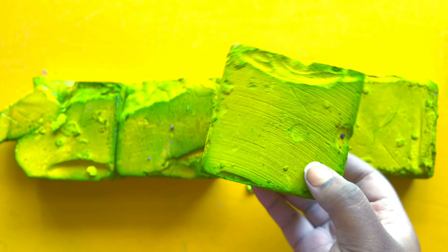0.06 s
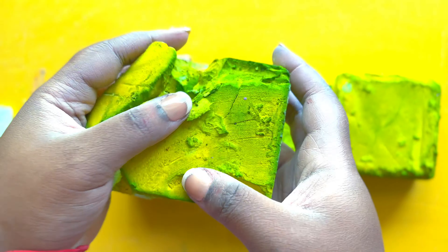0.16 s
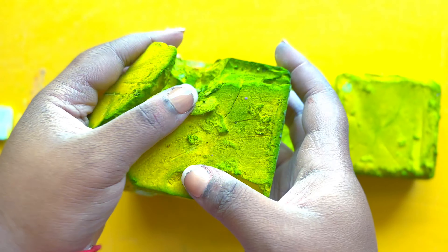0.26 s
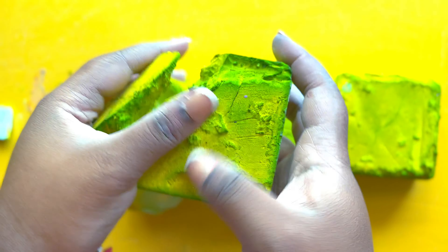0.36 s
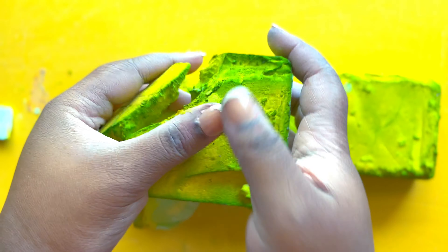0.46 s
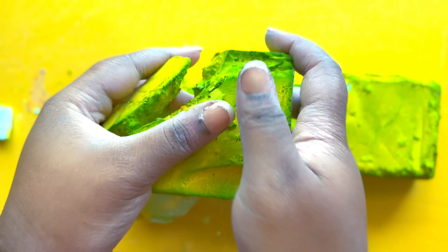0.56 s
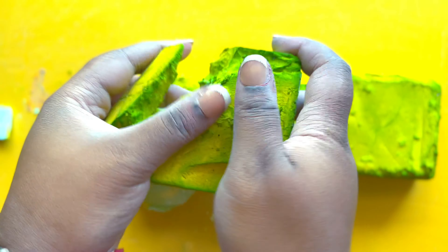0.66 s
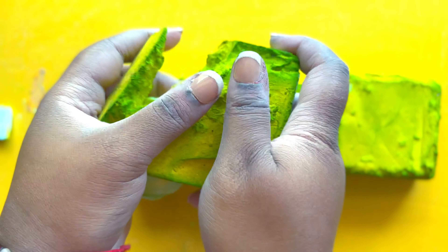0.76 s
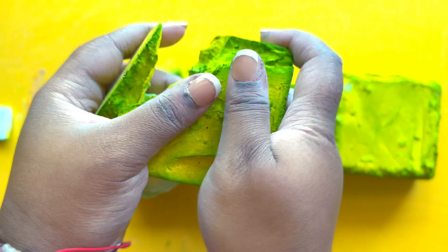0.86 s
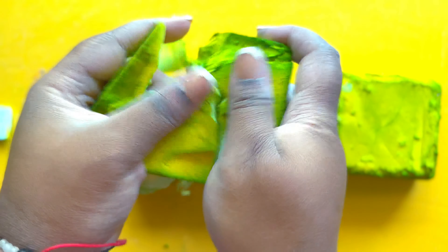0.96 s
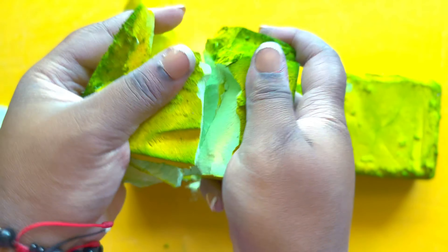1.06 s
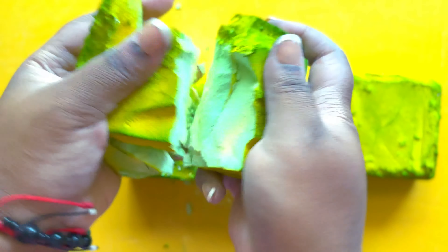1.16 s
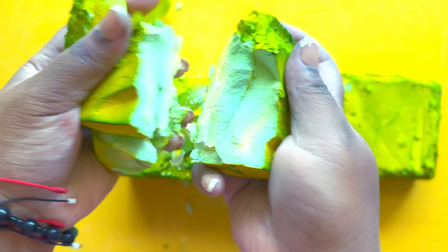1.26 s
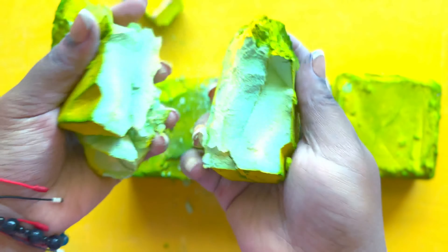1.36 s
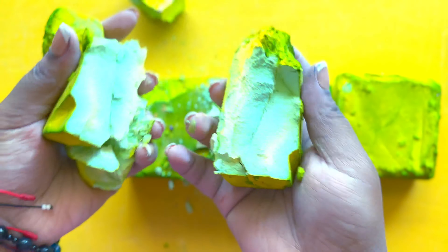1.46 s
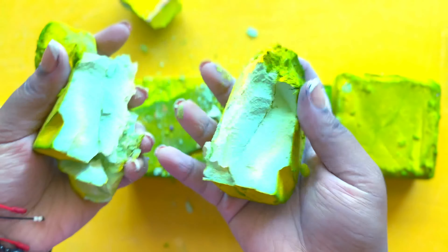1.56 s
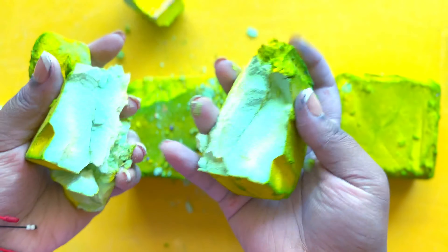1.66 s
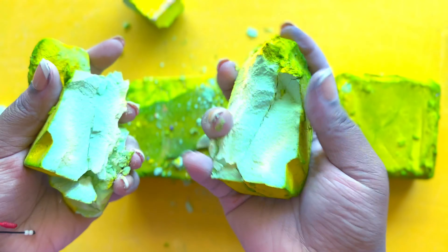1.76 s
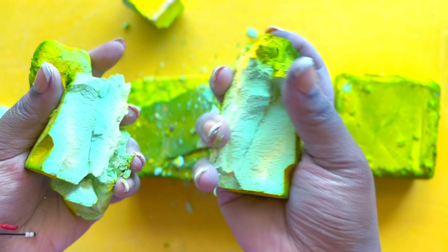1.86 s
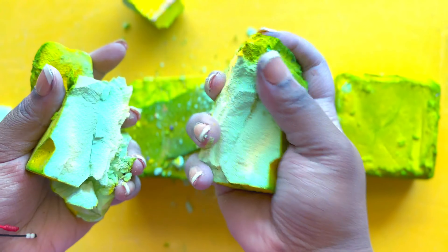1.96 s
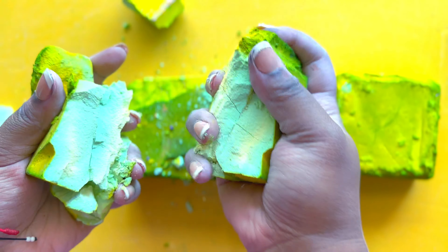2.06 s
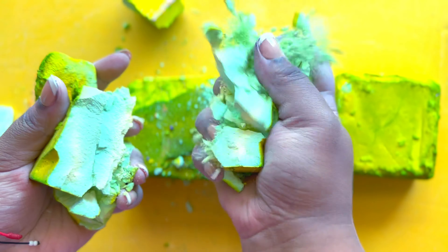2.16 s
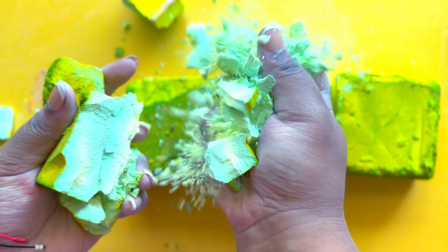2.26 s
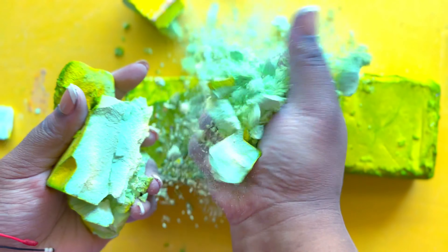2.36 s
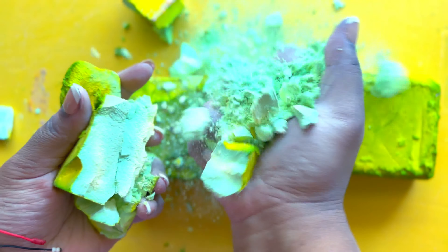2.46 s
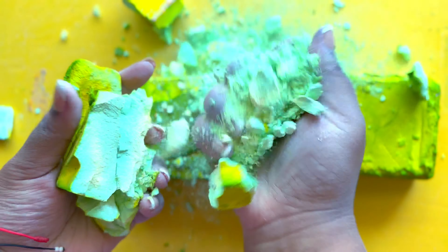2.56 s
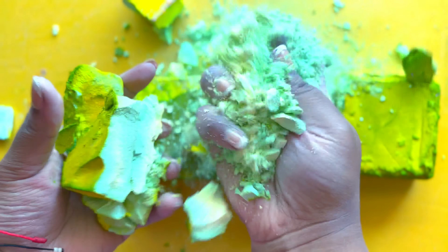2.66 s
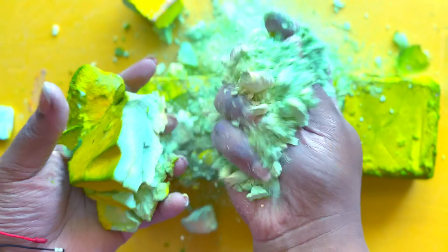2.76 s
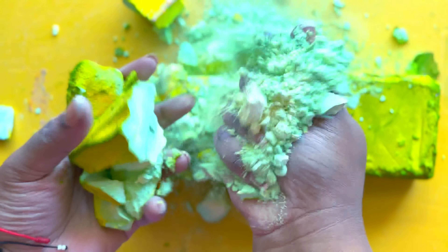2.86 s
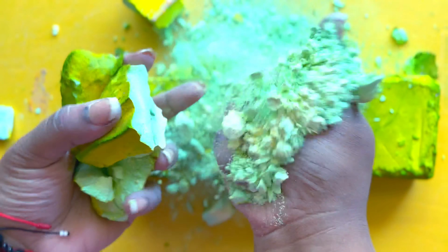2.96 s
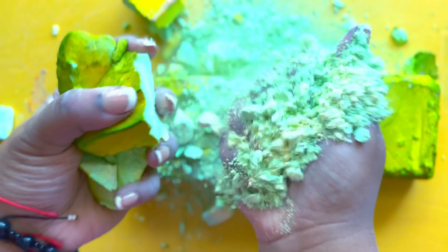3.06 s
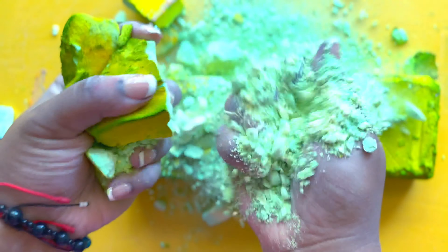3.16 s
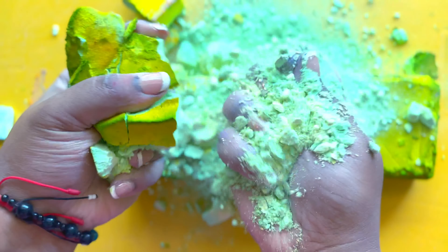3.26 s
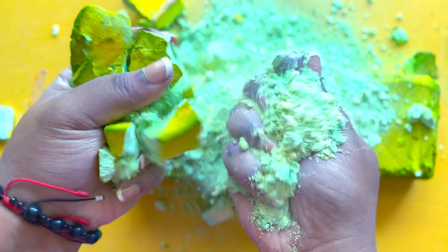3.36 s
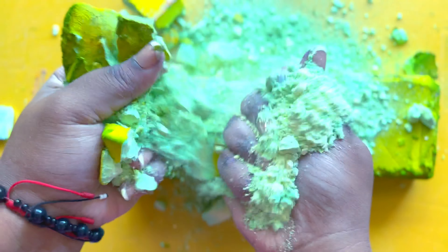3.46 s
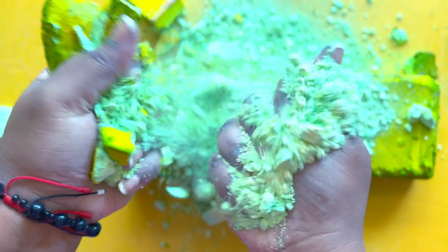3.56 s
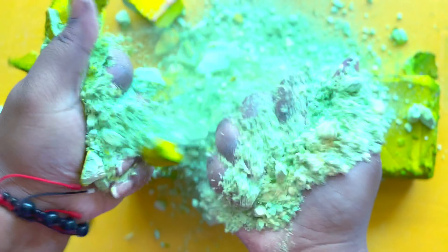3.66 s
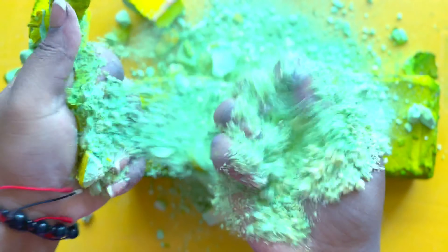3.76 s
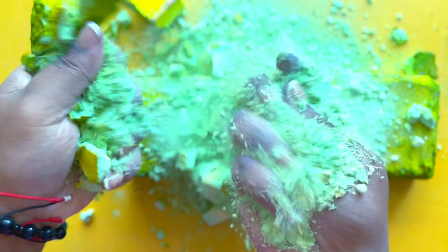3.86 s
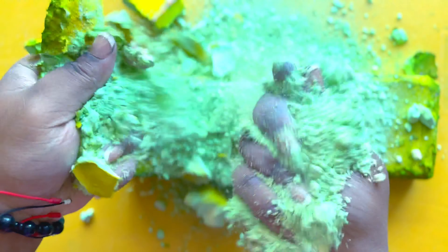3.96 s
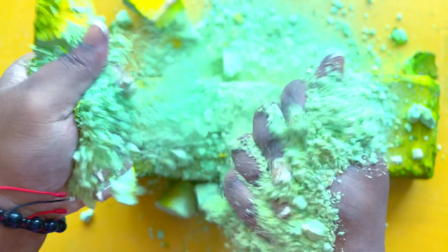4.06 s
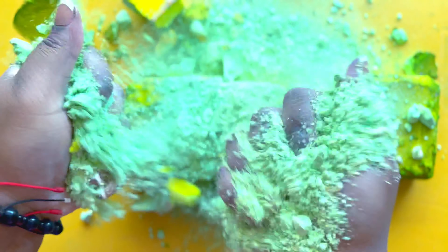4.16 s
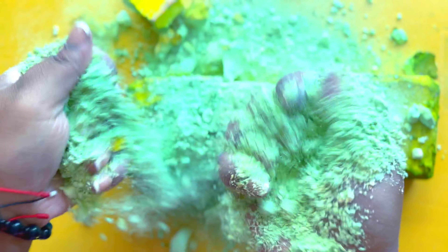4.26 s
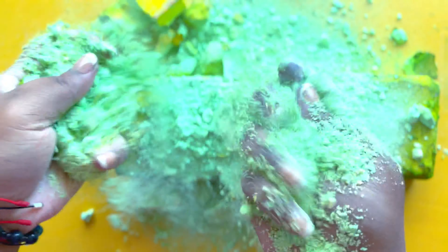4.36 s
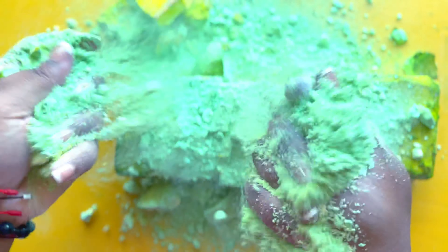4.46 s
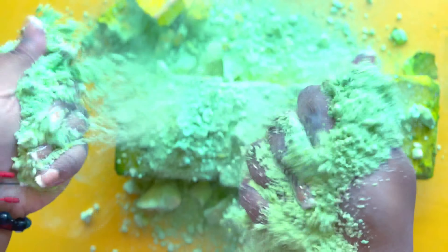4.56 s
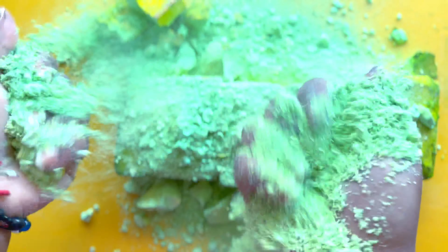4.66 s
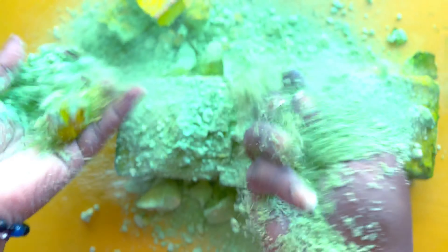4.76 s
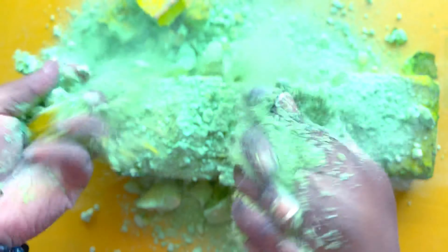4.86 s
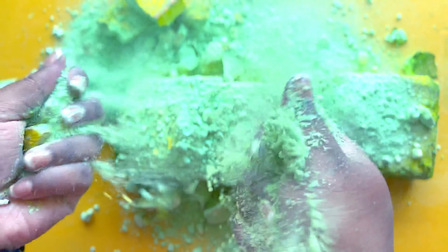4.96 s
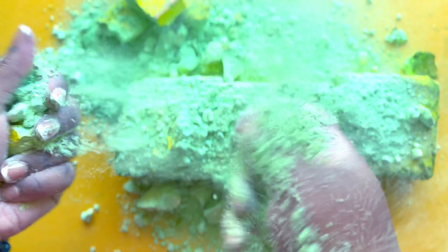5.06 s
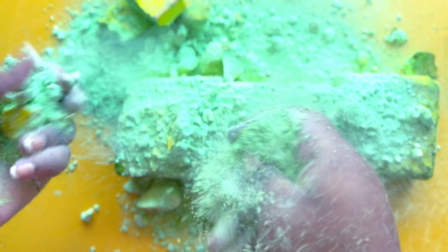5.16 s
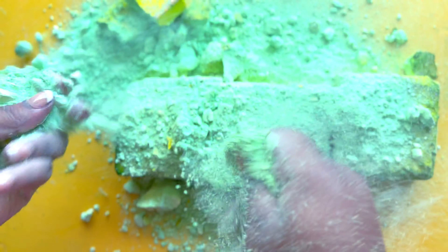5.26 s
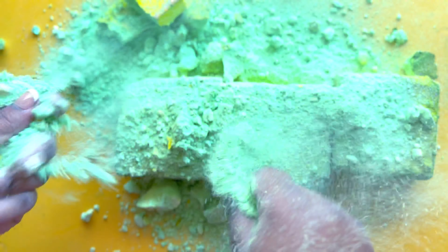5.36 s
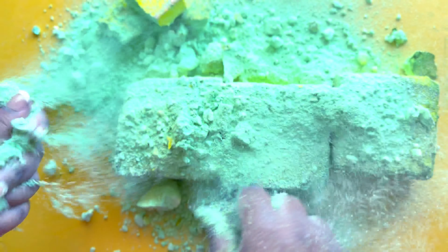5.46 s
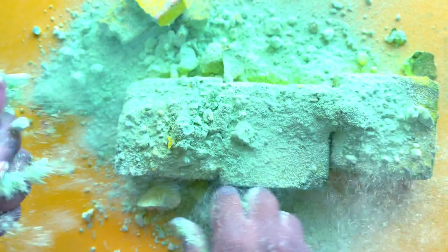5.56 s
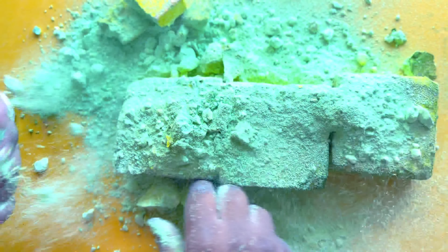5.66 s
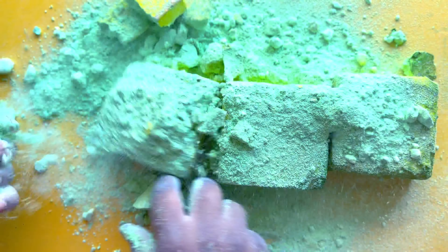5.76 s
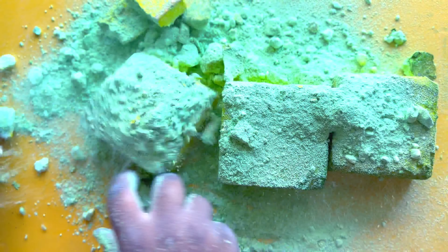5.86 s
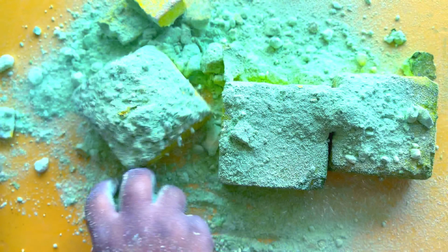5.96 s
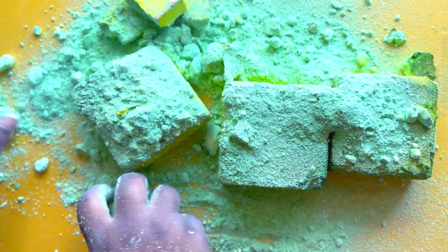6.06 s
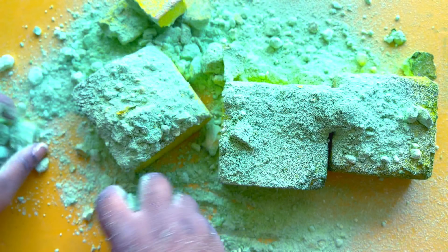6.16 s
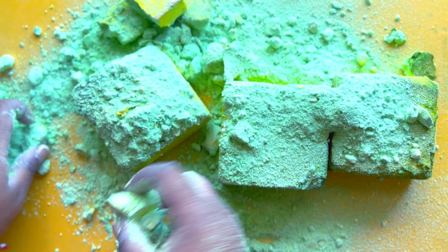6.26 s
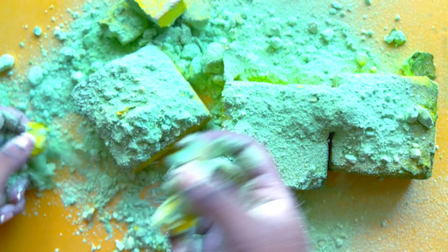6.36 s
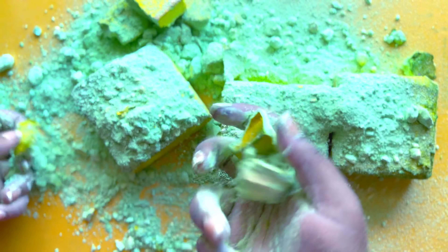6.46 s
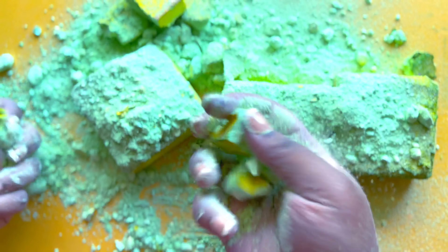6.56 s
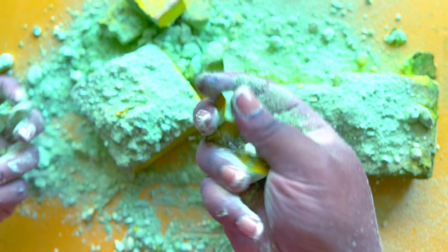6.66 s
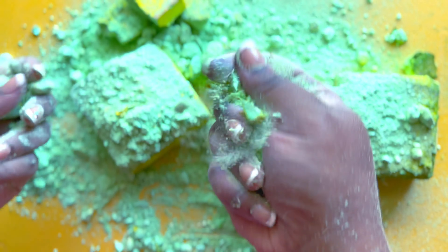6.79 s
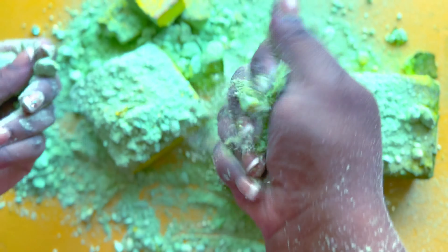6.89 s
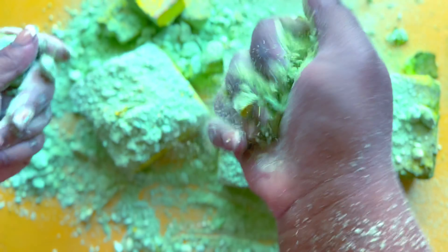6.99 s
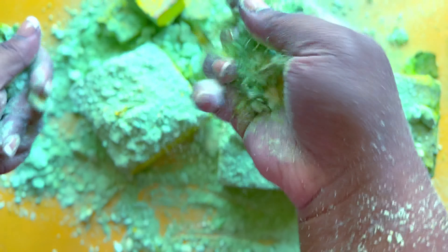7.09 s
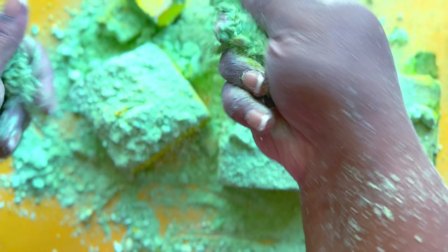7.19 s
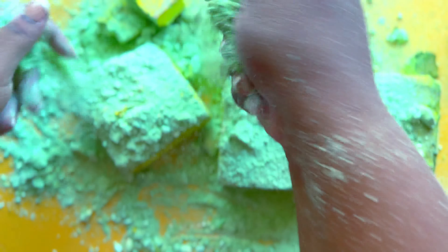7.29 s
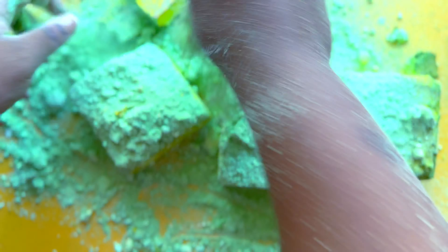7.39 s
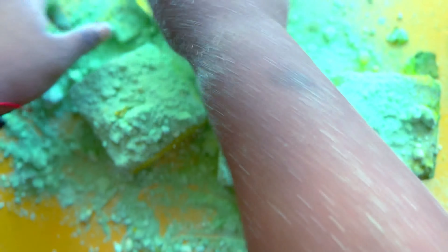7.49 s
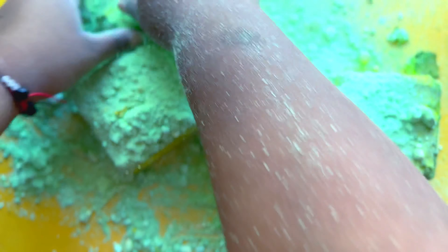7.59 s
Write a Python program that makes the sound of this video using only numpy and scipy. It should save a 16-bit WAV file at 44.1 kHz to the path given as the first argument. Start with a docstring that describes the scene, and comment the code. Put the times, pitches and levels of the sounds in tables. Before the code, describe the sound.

Close to a stereo microphone in a quiet room with a humming fan, hands break a dry chalk block. Soft rubbing and faint crackles lead to one sharp split, then the halves are crushed with dense crunches and snaps. Pieces knock and clink on the table and blocks, the loudest thud coming just past the middle. Powder is then swept in gritty scrapes, and a few last cracks follow.

```python
"""A fan hums in the room; close to a small stereo microphone, two hands break dry chalk over a table.
The blocks snap and crackle: short noise bursts, each filtered by the rings of its piece.
Loose pieces clink and knock as decaying bursts and sagging tones; the heaviest sound the table's modes.
Powder rubs, sifts and scrapes as coloured noise and grains whose levels swell with the hands."""
import sys
import numpy as np
from scipy import signal
from scipy.fft import rfft, irfft, next_fast_len
from scipy.io import wavfile
from scipy.ndimage import uniform_filter1d

SR = 44100
rng = np.random.default_rng(int(sys.argv[2]) if len(sys.argv) > 2 else 0)


def unload_wav(signal):
    """Save mono or channel-first audio to the path in sys.argv[1] as 16-bit WAV at rate SR, clipped to [-1, 1]."""
    wavfile.write(
        sys.argv[1],
        SR,
        np.round(np.clip(np.atleast_2d(signal).T, -1, 1) * 32767).astype(np.int16),
    )


N = 336483

# Colour of a fracture close by. Each row: frequency in Hz, gain in dB.
FRACTURE_COLOUR = [(60, -24), (200, -3.5), (450, 15.5), (700, 0.5), (950, 12.5), (1500, 5.5), (2800, 9),
                   (4500, 7), (7000, 8.5), (10000, 7.5), (15500, -0.5)]
# Colour of fine chalk powder. Each row: frequency in Hz, gain in dB.
FINE_POWDER_COLOUR = [(200, -27), (1500, -19.5), (2800, -10), (4500, -8.5), (6000, -10.5), (8200, -9.5),
                      (10500, -14), (15500, -18)]
# Chalk swept over the table and dragged on the blocks.
# Each row: middle in seconds, length in seconds, relative level of the middle in dB.
SWEEPS = [(5.2, 0.24, -57), (5.44, 0.08, -51), (5.6, 0.41, -52), (5.79, 0.046, -46.5), (5.85, 0.11, -51.5),
          (5.94, 0.096, -54), (6.062, 0.038, -44), (6.15, 0.1, -49), (6.29, 0.13, -58.5),
          (7.44, 0.12, -48.5)]
SNAP_RING_DB = 9.5  # strength of a broken piece's ring


def gain_of(db):
    """Decibels to a factor."""
    return 10 ** (np.asarray(db) / 20)


def evened(x):
    """Scales to an rms of 1."""
    return x / np.sqrt(np.mean(x ** 2) + 1e-20)


def read(points, hz):
    """Reads a table along a log-frequency axis, holding its end values."""
    f, value = np.transpose(points)
    return np.interp(np.log(hz + 1), np.log(f + 1), value)


def add(mix, s, sound):
    """Mixes a pair of signals in at time s."""
    part = mix[:, max(round(s * SR), 0):][:, :sound.shape[1]]
    part += sound[:, :part.shape[1]]


def bins(size):
    """Frequencies of a spectrum of this many samples."""
    return np.fft.rfftfreq(size, 1 / SR)


BINS = bins(size=2048)


def wander(hz, size):
    """Smooth random motion of rms 1, fading out above about hz."""
    padded = next_fast_len(size)
    lowpass = np.exp(-(bins(padded) / hz) ** 2)
    return evened(irfft(rfft(rng.standard_normal(padded)) * lowpass, padded)[:size])


def coloured(x, db):
    """Causal (minimum-phase) filter with the gain db, given on BINS: rings follow the click."""
    log_gain = np.log(gain_of(np.r_[db, db[-2:0:-1]]))
    taps = irfft(np.exp(np.conj(signal.hilbert(log_gain)))[:len(db)])
    return signal.oaconvolve(x, taps[None], axes=1)[:, :x.shape[1]]


def ring(hz, db, sharpness):
    """One resonant peak, as dB over frequency; it is flat if db is below 0."""
    off = sharpness * (BINS - hz) / hz
    return 10 * np.log10(1 + (gain_of(max(db, 0)) ** 2 - 1) / (1 + (2 * off) ** 2))


def overtones(hz, db, sharpness, count=4):
    """An irregular piece has a few more rings at chance places above its first."""
    ratios = rng.uniform(1.2, 4.5, count)
    return np.max([ring(min(hz * ratio, 14000), db, sharpness) for ratio in ratios], axis=0)


def piece(colour, treble_db, even_db, hz, ring_db, sharpness):
    """Spectrum of one piece: treble_db weighs most at the top, even_db nearly alike everywhere."""
    treble = read([(3800, 0.25), (6500, 0.72)], BINS)
    even = read([(750, 0.47), (1300, 0.52)], BINS)
    rings = ring(hz, ring_db, sharpness) + overtones(hz, db=6, sharpness=24)
    return read(colour, BINS) + treble * treble_db + even * even_db + rings


def burst(blow_s, near_db, near_s, room_db, room_s, ragged_db, push, size=9000):
    """A first push and a short blow, ragged splinters and near reflections, then the faint room."""
    t = np.arange(size) / SR
    blow = np.exp(-t / blow_s)
    near = gain_of(near_db + ragged_db * wander(540, size=size)) ** 2 * np.exp(-t / near_s)
    room = gain_of(room_db) ** 2 * np.exp(-t / room_s)
    pair = np.sqrt(blow + near + room) * rng.standard_normal((2, size))
    pair[0, 0] += push
    return pair


def at_level(x, db, attack_s):
    """Sets the rms level of the attack."""
    attack = x[:, :round(attack_s * SR)]
    return gain_of(db) * x / np.sqrt(np.mean(attack ** 2, axis=1, keepdims=True))


def clicks(per_s, spread_db):
    """Random clicks: many small, a few large."""
    happens = rng.random(N) < per_s / SR
    size = gain_of(spread_db * np.minimum(rng.exponential(1, N), 4))
    return happens * size * rng.choice([-1, 1], N)


def giving(rows, rise_s):
    """Power of squeezes or crushes: each gives way quickly, then dies down."""
    t = np.arange(N) / SR
    power = 0
    for s, db, fade_s in rows:
        rise = np.clip((t - s) / rise_s + .5, 0, 1)
        fade = np.exp(-np.clip((t - s) / fade_s, 0, 20))
        power = power + (gain_of(db) * rise * fade) ** 2
    return power


def swelling(rows, ends_db=-9):
    """Power of strokes or scrapes: each is one smooth swell, its ends at ends_db against its middle."""
    t = np.arange(N) / SR
    power = 0
    for s, length, db in rows:
        from_middle = np.minimum((2 * (t - s) / length) ** 2, 20)
        power = power + gain_of(db + ends_db * from_middle) ** 2
    return power


def trickling():
    """Power of the loose chalk that runs from the hands."""
    # Each row: time in seconds, relative level in dB.
    trickle_levels = [(0.16, -90), (0.195, -58), (0.48, -58), (0.55, -55), (0.63, -57.5), (0.81, -54),
                      (0.845, -64), (1.1, -58.5), (1.5, -61.5), (1.95, -62.5), (2.5, -58), (3.26, -53.5),
                      (3.7, -60.5), (4.0, -55), (5.05, -56.5), (5.1, -73), (5.159, -57), (6.199, -55.5),
                      (6.34, -63), (6.39, -65), (6.54, -76), (6.579, -57), (6.72, -57.5), (7.05, -56),
                      (7.18, -58), (7.35, -54), (7.63, -57.5)]
    return gain_of(np.interp(np.arange(N) / SR, *np.transpose(trickle_levels))) ** 2


def resting():
    """Spectrum that the blocks on the table give to what strikes or scrapes them."""
    # Each row: mode in Hz, strength in dB, sharpness.
    block_modes = [(1990, 6.5, 68), (2460, -7.5, 30), (2890, 17.5, 32), (3360, 6.5, 18)]
    return sum(ring(hz, db, sharpness) for hz, db, sharpness in block_modes)


def fan(air_db=-45.0, waver_hz=7):
    """Wavering motor tones over the rumble of moving air."""
    # Rumble of the air. Each row: frequency in Hz, gain in dB.
    rumble_colour = [(18, -27), (40, -3.5), (60, 5), (100, 0), (140, -10.5), (185, -11.5), (240, -12.5),
                     (320, -21.5), (430, -15), (620, -34.5), (860, -33), (1400, -31.5), (4000, -47),
                     (8000, -54)]
    # Motor tones. Each row: frequency in Hz, rms level in dB, unsteadiness from 0 to 1.
    motor_tones = [(120.6, -41.5, 0.02), (199.7, -66.5, 1), (246.7, -55.5, 0.97), (286.5, -63, 0.91)]
    size, t = next_fast_len(N), np.arange(N) / SR
    spectrum = rfft(rng.standard_normal((2, size))) * gain_of(read(rumble_colour, bins(size)))
    out = gain_of(air_db) * evened(irfft(spectrum, size)[:, :N])
    for hz, db, unsteady in motor_tones:
        drift = (wander(waver_hz, size=N) + 1j * wander(waver_hz, size=N)) / np.sqrt(2)
        envelope = np.sqrt(1 - unsteady ** 2) + unsteady * drift
        tone = (envelope * np.exp(2j * np.pi * hz * t)).real
        out[0] += gain_of(db) * evened(tone)
    return out


def whirr(level_db=-63, hz=850, sharpness=6, swell_db=7.0):
    """Air whirrs through the fan's blades in one broad band that slowly grows."""
    band_db = -20 * np.log10(1 + (sharpness * (BINS - hz) / hz) ** 2)
    air = evened(coloured(rng.standard_normal((2, N)), np.maximum(band_db, -60)))
    return air * gain_of(level_db + swell_db * np.arange(N) / N)


def rub(level_db=2.5, waver_db=2.5):
    """Skin slides on fine powder: soft rubbing noise with a slightly uneven, fixed tone colour."""
    # Each row: frequency in Hz, gain in dB.
    rub_colour = [(100, -17.5), (250, 9), (600, 0), (1000, -5.5), (1800, -3.5), (2800, 0.5), (4800, -5.5),
                  (7100, -7.5), (9500, -2.5), (11500, -40.5), (15500, -2)]
    # Narrow peaks in the colour of the noise. Each row: frequency in Hz, strength in dB, sharpness.
    rub_peaks = [(2676, 4.2, 25), (3480, 2.2, 56), (5500, 6, 52), (6000, 6, 56), (6960, 4.2, 17),
                 (8100, 2.4, 58)]
    colour = read(rub_colour, BINS) + sum(ring(hz, db, sharpness) for hz, db, sharpness in rub_peaks)
    noise = evened(coloured(rng.standard_normal((2, N)), colour))
    return noise * gain_of(level_db + waver_db * wander(40, size=N))


def powder(level_db=2, patch_db=9, slip_db=3, count=5):
    """Fine grains rub and sift: each patch of contact has its own pitch, and catches and slips by itself."""
    out = np.zeros((2, N))
    for hz in np.geomspace(2800, 12000, count):
        grains = evened(clicks(per_s=900, spread_db=3.5))
        fizz = np.array([grains, grains * rng.choice([-1, 1], N)]) + rng.standard_normal((2, N))
        fizz = coloured(fizz, read(FINE_POWDER_COLOUR, BINS) + ring(hz, patch_db, sharpness=1.0))
        out += fizz * gain_of(slip_db * wander(60, size=N))
    return evened(out) * gain_of(level_db)


def grit(level_db=-5, grains_per_s=100, count=28):
    """Separate hard grains patter down out of the powder, each with a thin ring."""
    out = np.zeros((2, N))
    for hz in np.geomspace(2200, 9500, count):
        tick = burst(blow_s=.0003, near_db=-17, near_s=.005, room_db=-32, room_s=.03, ragged_db=3, push=2)
        tick = coloured(tick, read(FINE_POWDER_COLOUR, BINS) + ring(hz, db=15, sharpness=22))
        falls = clicks(grains_per_s / count, spread_db=3)
        out += signal.oaconvolve(falls[None], evened(tick), axes=1)[:, :N]
    return evened(out) * gain_of(level_db)


def scrape(level_db=0, judder_db=2.0, blocks_share=0.36):
    """Swept powder rubs, gritty with coarse grains, and softly sounds the blocks on the table."""
    # Each row: frequency in Hz, gain in dB.
    scrape_colour = [(150, -19), (400, 2.5), (900, 4.5), (1400, -17), (2200, 2.5), (3400, 1), (4700, -10),
                     (7000, -4), (10000, -4), (15500, -54)]
    grains = np.array([evened(clicks(per_s=1100, spread_db=3)) for signal_index in range(2)])
    contact = 1.5 * grains + rng.standard_normal((2, N))
    sweep = evened(coloured(contact, read(scrape_colour, BINS) + blocks_share * resting()))
    return sweep * gain_of(level_db + judder_db * wander(60, size=N)) * np.sqrt(swelling(SWEEPS))


def patchy(x, patch_db=3.6, patch_s=.016, patch_hz=380):
    """Uneven friction: the noise swells and fades at random in small patches of time and frequency."""
    z = signal.stft(x, nperseg=512)[2]
    field = rng.standard_normal(z.shape[1:])
    # two passes of smoothing over frequency and time spread the chance into patches
    for smoothing in range(2):
        field = uniform_filter1d(field, max(round(patch_hz * 512 / SR), 1), axis=0)
        field = uniform_filter1d(field, max(round(patch_s * SR / 256), 1), axis=1)
    return signal.istft(z * evened(gain_of(patch_db * evened(field))), nperseg=512)[1][:, :N]


def crumbs(level_db=1.5, clump_db=2.5, ring_db=14, sharpness=12, per_s=620, spread_db=4.5, count=32):
    """Crumbs of many sizes break off in clumps, each size with its own ring."""
    # Each row: frequency in Hz, gain in dB.
    crumb_colour = [(80, -53), (220, 21), (450, 3), (650, 8.5), (900, 9), (1500, 1), (2900, 1),
                    (4500, -5.5), (7000, -20), (15500, -38)]
    out = np.zeros((2, N))
    for hz in np.geomspace(1300, 8000, count):
        tick = burst(blow_s=.0004, near_db=-16, near_s=.006, room_db=-29, room_s=.03, ragged_db=3, push=2)
        tick = coloured(tick, read(crumb_colour, BINS) + ring(hz, ring_db, sharpness))
        breaks = clicks(per_s / count, spread_db)
        out += signal.oaconvolve(breaks[None], tick, axes=1)[:, :N]
    return evened(out) * gain_of(level_db + clump_db * wander(36, size=N))


def chips(crumbling, level_db=1.5, dullest_db=-30, even_db=-12, splinters_db=-20, sharpness=4, count=34):
    """Small chips crack off at chance moments, louder when the chalk is crumbling hard."""
    # Lowest and highest ring of the chips in Hz.
    chip_range = [1390, 4250]
    out = np.zeros((2, N))
    for when, pitch, dullness in rng.random((count, 3)):
        hz, at = np.interp(pitch, [0, 1], chip_range), int(when * N)
        crack = burst(blow_s=.0006, near_db=splinters_db, near_s=.007, room_db=-34, room_s=.03,
                      ragged_db=2.5, push=3)
        spectrum = piece(FRACTURE_COLOUR, dullest_db * dullness, even_db, hz, SNAP_RING_DB, sharpness)
        crack = coloured(crack, spectrum)
        add(out, at / SR, crumbling[at] * at_level(crack, level_db, attack_s=.004))
    return out


def crunch(level_db=0, grains_per_s=1500, spread_db=2.5, clump_db=2.0, rise_s=0.0037, count=8):
    """A dense crowd of coarse grains shears at once as a piece collapses, bright and crunching."""
    # Each row: start in seconds, level in dB, time in which it dies down in seconds.
    crushes = [(2.272, -40, 0.11), (2.3165, -31.5, 0.019), (2.35, -43, 0.035), (2.385, -44.5, 0.16),
               (4.308, -34.5, .02)]
    # Each row: frequency in Hz, gain in dB.
    crush_colour = [(200, -30), (1000, 2), (2000, 3), (3500, 2), (5500, 0.5), (7500, -2), (9200, -5.5),
                    (11000, -35), (15500, -42)]
    out = np.zeros((2, N))
    for hz in np.geomspace(2000, 7000, count):
        grains = np.array([clicks(grains_per_s / count, spread_db) for signal_index in range(2)])
        out += coloured(grains, read(crush_colour, BINS) + ring(hz, db=8, sharpness=6))
    clumps = gain_of(level_db + clump_db * wander(120, size=N))
    return evened(out) * clumps * np.sqrt(giving(crushes, rise_s))


def lump(level_db=-23):
    """The table gives a deep answer under the two heaviest lumps; a soft landing spares the higher modes."""
    # Each row: landing in seconds, relative level in dB, softness in dB lost per octave.
    landings = [(2.766, -4.5, 6.5), (4.2688, 2, 9.5)]
    # Modes of the table top. Each row: frequency in Hz, relative level in dB, 60 dB decay in seconds.
    table_modes = [(410, -3.5, 0.099), (520, 0, 0.035), (635, 6, 0.051), (858, 10, 0.054), (960, 1, 0.023)]
    out, t = np.zeros((2, N)), np.arange(6000) / SR
    contact = 1 - np.exp(-t / .0007)
    for s, db, softness_db in landings:
        for hz, mode_db, t60 in table_modes:
            strength_db = level_db + db + mode_db - softness_db * np.log2(hz / table_modes[0][0])
            mode = contact * gain_of(strength_db - 60 * t / t60) * np.exp(2j * np.pi * hz * t)
            add(out, s, np.array([mode.imag, mode.real]))
    return out


def thuds(level_db=0, rattle_db=-15, dull_db=12, rise_cycles=1.33, sag=0.72, sag_s=0.013):
    """Heavy lumps knock on palm and table: a few round cycles of sagging pitch, then a faint rattle."""
    # Each row: start in seconds, level in dB, starting pitch in Hz.
    knocks = [(0.439, -31.5, 285), (0.9609, -28, 460), (0.962, -31.5, 188.4), (1.0084, -26, 314),
              (1.0496, -31.5, 295), (1.055, -32, 168), (1.085, -35, 390), (1.150, -33.5, 372),
              (1.181, -39, 400), (1.198, -37, 307), (2.101, -39, 465), (2.407, -31, 386),
              (2.7665, -26, 372), (3.064, -40, 450), (3.3362, -31, 460), (4.2665, -15.5, 532),
              (5.464, -34, 203), (6.04, -37, 353), (6.048, -34.5, 336), (7.381, -34, 594)]
    # Colour of the rattle. Each row: frequency in Hz, gain in dB.
    rattle_colour = [(70, -41), (190, 16), (290, 0.5), (420, 4), (520, 5), (590, -19), (680, 4), (770, -6),
                     (900, 3), (1400, -16), (4000, 21), (12000, -59)]
    out, t = np.zeros((2, N)), np.arange(9000) / SR
    for s, db, hz in knocks:
        age = t * hz / rise_cycles  # 1 at the peak, so high knocks peak sooner
        pitch = hz * (1 - sag * (1 - np.exp(-t / sag_s)))
        knock = (age * np.exp(1 - age)) ** 2 * np.exp(2j * np.pi * np.cumsum(pitch) / SR)
        rattle = burst(blow_s=1 / hz, near_db=-10, near_s=.012, room_db=-20, room_s=.04, ragged_db=2, push=0)
        softness_db = dull_db * np.log2(np.maximum(BINS / (2 * hz), 1))
        rattle = coloured(rattle, np.maximum(read(rattle_colour, BINS) - softness_db, -80))
        rattle = at_level(rattle, rattle_db, attack_s=0.015)
        add(out, s, gain_of(db + level_db) * (np.array([knock.imag, knock.real]) + rattle))
    return out


def clinks(level_db=-4, push=5, blocks_share=0.7, chatter_db=-6, even_db=-30):
    """Falling pieces ring briefly together with the blocks they hit, and chatter as they settle."""
    # Each row: landing in seconds, level in dB before level_db, ring in Hz, treble tilt in dB.
    landings = [(2.4325, -32.5, 1450, -22), (2.446, -32, 2080, -33), (2.5347, -28.5, 3250, -29),
                (2.605, -36.5, 2650, -41), (2.81, -28, 1476, -36), (2.864, -35.5, 2080, -37),
                (3.029, -31, 1580, -36), (3.48, -38, 3200, -14), (3.876, -19, 2180, -29),
                (3.9841, -35, 3030, -12), (4.1185, -34.5, 3260, -37), (4.156, -39.5, 2330, -15),
                (4.2252, -28, 3880, -7), (4.232, -30, 3200, -10), (4.3184, -34.5, 1740, -15),
                (4.354, -30.5, 3400, -12), (4.3834, -22.5, 2790, -9), (4.517, -41.5, 3140, -11),
                (4.658, -29, 3900, -6), (4.6762, -25.5, 3470, -13), (4.829, -40, 1510, -4),
                (4.8766, -29.5, 2550, -20), (4.922, -30, 2700, -19), (5.4185, -35, 2330, -17),
                (5.435, -30, 2270, -21), (5.465, -27.5, 2550, -18), (5.51, -36, 2820, -8),
                (5.611, -29, 2840, -13), (5.6733, -27.5, 2020, -32), (5.6745, -25.5, 2870, -29),
                (5.951, -35.5, 2190, -14), (6.015, -42, 2110, -27), (6.0813, -37.5, 2960, -9),
                (7.3259, -23, 2460, -13), (7.3278, -37, 2850, -27), (7.381, -37, 1430, -28),
                (7.443, -30.5, 2860, -3)]
    # Each row: frequency in Hz, gain in dB.
    clink_colour = [(60, -3), (200, 5), (450, 16), (700, 16), (1000, 11), (1500, 11.5), (3000, 7.5),
                    (4500, 12.5), (7000, 18), (10000, 19), (15500, -75)]
    # a middling piece rings at middling_hz; bigger ones ring lower and more purely
    middling_hz, middling_ring_db, purer_db_per_octave = 2500, 24, 15
    middling_sharpness, purity_share = 3.2, 0.67  # share of the stronger ring that also narrows it
    out = np.zeros((2, N))
    for s, db, hz, treble_db in landings:
        hit = burst(blow_s=.001, near_db=chatter_db, near_s=.006, room_db=-27, room_s=.03,
                    ragged_db=2.5, push=push)
        purer_db = purer_db_per_octave * max(np.log2(middling_hz / hz), 0)
        sharpness = middling_sharpness * gain_of(purity_share * purer_db)
        spectrum = piece(clink_colour, treble_db, even_db, hz, middling_ring_db + purer_db, sharpness)
        hit = coloured(hit, spectrum + blocks_share * resting())
        add(out, s, at_level(hit, db + level_db, attack_s=.005))
    return out


def split(level_db=-16, split_s=0.9603):
    """The whole block splits in two and its halves ring briefly as they part."""
    # Each row: mode in Hz, relative level in dB, 60 dB decay in seconds.
    half_modes = [(1030, -10, 0.02), (1940, 5.5, 0.012), (5360, -13, 0.014), (7840, -4, 0.012)]
    out, t = np.zeros((2, N)), np.arange(3000) / SR
    opening = 1 - np.exp(-t / .0005)
    for hz, db, t60 in half_modes:
        turn = np.exp(2j * np.pi * (hz * t + rng.random()))
        mode = opening * gain_of(level_db + db - 60 * t / t60) * turn
        add(out, split_s, np.array([mode.imag, mode.real]))
    return out


def snaps(level_db=-7.5, sharpness=5, even_db=-24, even_slope=0.99):
    """A crack runs through the block in about a millisecond; splinters and the ring of the piece follow."""
    # Single fractures, loud and faint. Each row: start in seconds, level in dB before level_db,
    # treble tilt in dB, ring of the piece in Hz, level of the splinters after the crack in dB.
    fractures = [(0.163, -50.5, -5, 3000, -31), (0.8554, -30, -19, 1920, -37), (0.8917, -28, 6, 3020, -11),
                 (0.926, -30, 2, 3100, -8), (0.9596, -14.5, 1.5, 2060, -8), (1.0469, -31, 3, 4860, 15),
                 (1.1708, -35.5, -12, 4150, -8), (1.277, -34.5, 1, 2060, -9), (1.396, -34.5, -20, 2170, -6),
                 (1.4173, -38, -26, 1980, -8), (1.566, -40, -8, 4300, -8), (1.6001, -36.5, -14, 4660, -14),
                 (1.9907, -41.5, 20, 1500, -8), (2.044, -31.5, 4, 2270, -8), (2.0477, -24, -19, 2410, -13),
                 (2.087, -28.5, 16, 2640, 1), (2.1004, -21, -55, 2050, -25),
                 (2.2017, -27.5, -19, 2380, -10), (2.2076, -33.5, 11, 2060, -10),
                 (2.2586, -34, 11, 1360, -1), (2.269, -25.5, -14, 1286, 6.5), (2.316, -37, -3, 2380, -13),
                 (2.342, -31, -32, 1590, -11), (2.353, -30, 3, 1700, -19), (2.389, -32, -10, 2300, -8),
                 (2.396, -37, -8, 2820, -10), (2.647, -33.5, -27, 2330, -3), (2.7335, -26, -26, 2290, 6),
                 (2.7631, -21.5, -18, 2900, -1), (2.798, -34, -7, 3500, -14), (2.9644, -33, 2, 2110, -12),
                 (2.9987, -33, -29, 1750, -12), (3.009, -32, -22, 2120, -12),
                 (3.0636, -22.5, -14, 1490, -6), (3.071, -22.5, -8, 2100, -11),
                 (3.076, -31, -19, 2020, -23), (3.106, -23, -25, 1380, -30), (3.1231, -16, -16, 2210, -18),
                 (3.136, -31, -1, 1900, -10), (3.149, -30.5, 15, 2700, -10), (3.161, -28, -17, 1410, -13),
                 (3.2084, -34.5, -9, 3130, -7), (3.234, -32, 8, 1380, -14), (3.3357, -21.5, -7, 1900, -22),
                 (3.379, -25, -12, 2000, -12), (3.4163, -38, -2, 2280, -17), (3.431, -30, -17, 2400, -30),
                 (3.5927, -31, 13, 3000, -12), (3.6287, -42, -22, 1820, 0), (3.664, -41, -28, 1970, -10),
                 (3.738, -30, 3, 1740, 10), (3.8344, -43.5, -10, 1900, -8), (3.8773, -28, -22, 3120, -7),
                 (4.2654, -21, -23, 1220, -5), (4.3082, -28, -12, 2640, 9), (4.9685, -29.5, -14, 2740, -6),
                 (5.014, -41, 14, 3300, -18), (5.0284, -43, 2, 3480, -10), (5.2468, -34, 2, 3380, -10),
                 (5.345, -30.5, 2, 3900, -17), (5.3535, -32.5, -26, 3530, -5), (5.481, -28.5, -6, 2870, 8),
                 (6.689, -18.5, -11, 2220, -14), (6.697, -26, -16, 2500, -11), (6.6994, -31, 1, 2900, -12),
                 (6.791, -37.5, 0, 1910, -26), (6.839, -33.5, -20, 2640, -12),
                 (6.9177, -28.5, 2, 1710, -19), (7.2674, -28, -30, 2920, -13),
                 (7.274, -31, -33, 2800, -8.5), (7.327, -29.5, -19, 2950, -4), (7.5935, -31, -5, 4070, -1)]
    out = np.zeros((2, N))
    for s, db, treble_db, hz, splinters_db in fractures:
        crack = burst(blow_s=.0008, near_db=splinters_db, near_s=.007, room_db=-34, room_s=.03,
                      ragged_db=3, push=6)
        spectrum = piece(FRACTURE_COLOUR, treble_db, even_db - even_slope * treble_db, hz,
                         SNAP_RING_DB, sharpness)
        add(out, s, at_level(coloured(crack, spectrum), db + level_db, attack_s=.004))
    return out


def widened(pair, left_db=.4):
    """Stereo widening: left is the first signal; right is it phase-shifted, blended with the second."""
    # Likeness of the two channels. Each row: frequency in Hz, likeness from -1 to 1.
    channel_likeness = [(200, .995), (320, .95), (450, .8), (620, -.1), (800, -.1), (1100, .55),
                        (1900, .88), (2500, .45), (3500, .35), (4200, 0), (4800, -.5), (5300, -.2),
                        (5700, .85), (10000, .9), (12000, .99), (15500, .82)]
    # Each row: frequency in Hz, phase by which the right leads in radians.
    right_lead = [(100, 0), (2500, .1), (5600, .45), (8000, 1.6), (10000, 2.6), (11500, 3.1), (13500, 3.4),
                  (15500, 4.4)]
    size = next_fast_len(N + 2048)
    (shared, own), hz = rfft(pair, size), bins(size)
    same = read(channel_likeness, hz)
    right = same * np.exp(1j * read(right_lead, hz)) * shared + np.sqrt(1 - same ** 2) * own
    return irfft(np.array([gain_of(left_db) * shared, right]), size)[:, :N]


def scene():
    """Chalk and fan at the microphone."""
    # The chalk gives way in the fist and crumbles on.
    # Each row: start in seconds, relative level in dB, time in which it dies down in seconds.
    squeezes = [(0.96, -48, 0.066), (2.081, -42.5, 0.077), (2.28, -43, 0.23), (2.75, -53, 0.93),
                (2.99, -47.5, 0.14), (3.1, -46, 0.068), (3.33, -49.5, 0.37), (3.87, -47, 0.062),
                (4.09, -42, 0.058), (4.3, -46.5, 0.22), (4.66, -53, 1), (4.91, -58, 0.099),
                (5.16, -44, 0.024), (5.42, -61, 0.19), (5.67, -49, 0.054), (6.70, -45, 0.048)]
    # Fingers slide over chalk and powder.
    # Each row: middle in seconds, length in seconds, relative level of the middle in dB.
    strokes = [(0.353, 0.03, -51.5), (0.435, 0.034, -47.5), (0.691, 0.055, -47.5), (0.781, 0.087, -55),
               (1.171, 0.031, -50.5), (1.338, 0.02, -50.5), (1.553, 0.16, -50), (1.645, 0.04, -44.5),
               (1.747, 0.041, -49.5), (3.486, 0.026, -47), (4.11, 0.098, -54), (4.318, 0.041, -44),
               (4.696, 0.12, -49), (5.43, 0.055, -49.5), (5.88, 0.4, -54), (6.136, 0.021, -48),
               (6.297, 0.13, -56.5), (6.62, 0.11, -60), (6.912, 0.16, -56), (7.59, 0.3, -54)]
    # shares of the trickle and the squeezes that sound as crumbs or as powder
    trickle_crumbs_db, squeeze_powder_db, trickle_powder_db = -5, -7.5, -12

    squeeze, trickle = giving(squeezes, rise_s=0.032), trickling()
    loose = trickle + swelling(SWEEPS)
    crumbling = np.sqrt(squeeze + gain_of(trickle_crumbs_db) ** 2 * loose)
    carried = gain_of(squeeze_powder_db) ** 2 * squeeze + gain_of(trickle_powder_db) ** 2 * trickle
    rubbing = np.sqrt(swelling(strokes) + carried)

    background = fan() + whirr()
    friction = patchy(scrape() + np.sqrt(trickle) * rub() + rubbing * powder()) + rubbing * grit()
    breaking = crumbling * crumbs() + chips(crumbling) + crunch()
    hits = lump() + thuds() + clinks() + split() + snaps()
    return widened(background + friction + breaking + hits)


def record(dry):
    """The recorder's band limit, at 15.9 kHz."""
    lowpass = signal.firwin(255, 15900, window=("kaiser", 8), fs=SR)
    return signal.oaconvolve(dry, lowpass[None], "same")


dry = scene()
out = record(dry)
unload_wav(out)
```